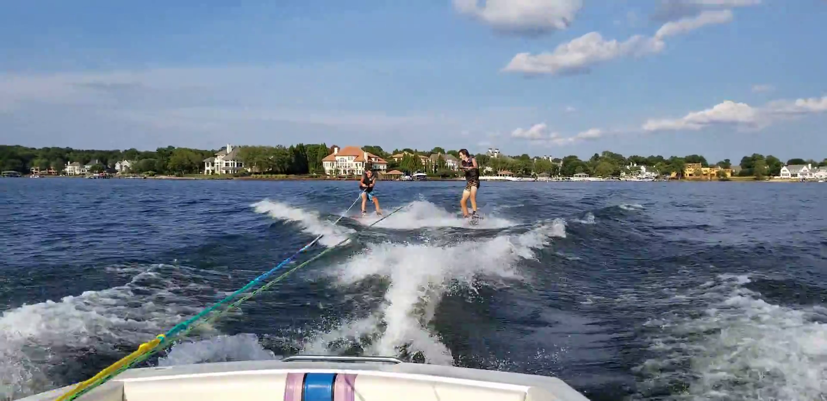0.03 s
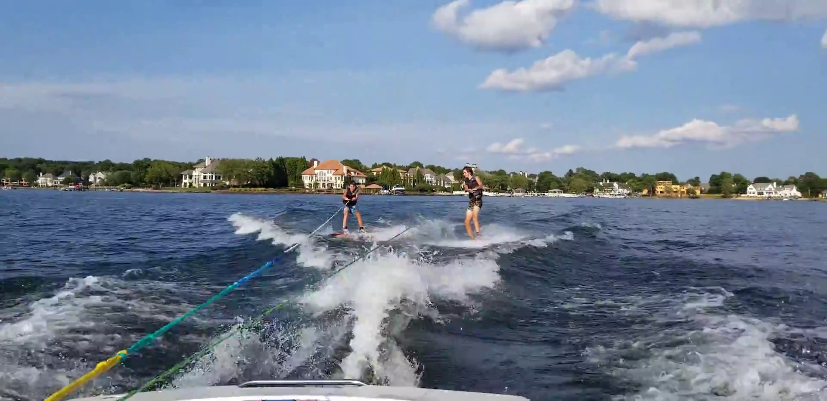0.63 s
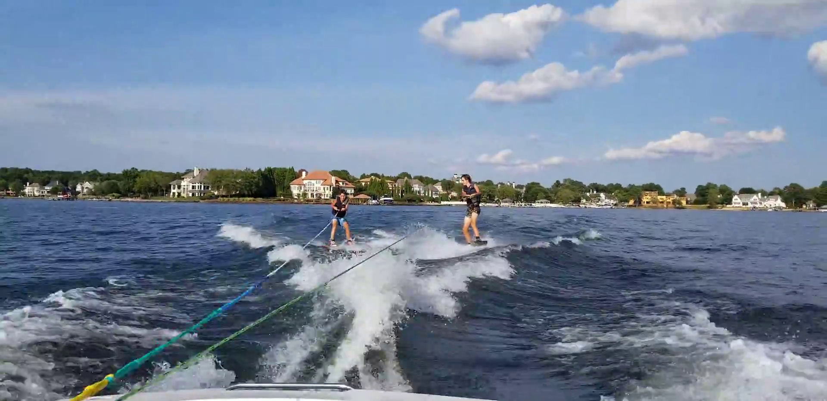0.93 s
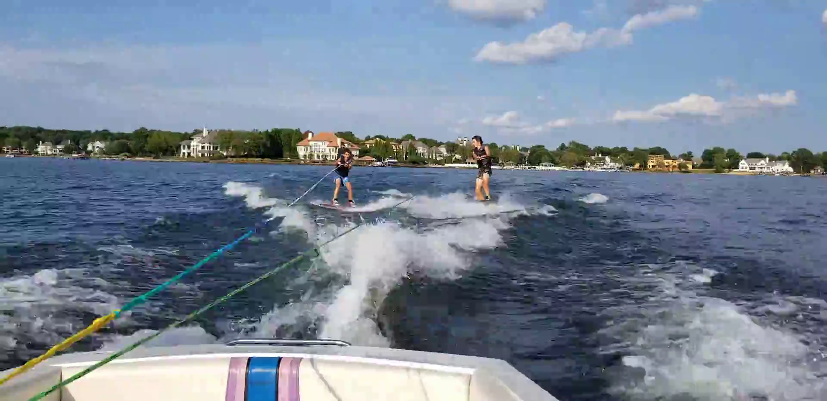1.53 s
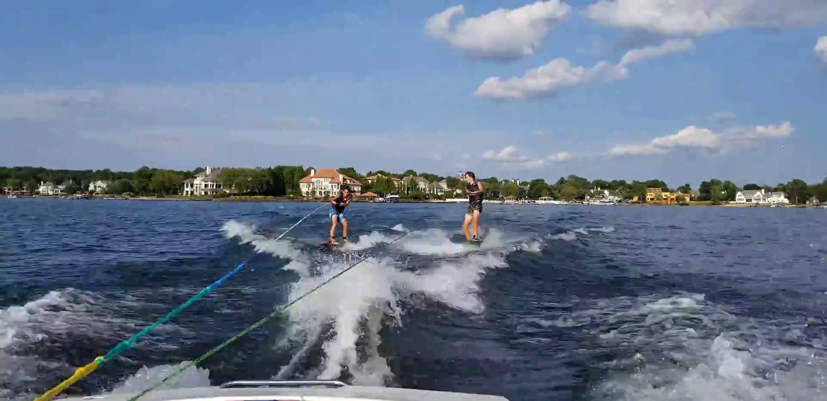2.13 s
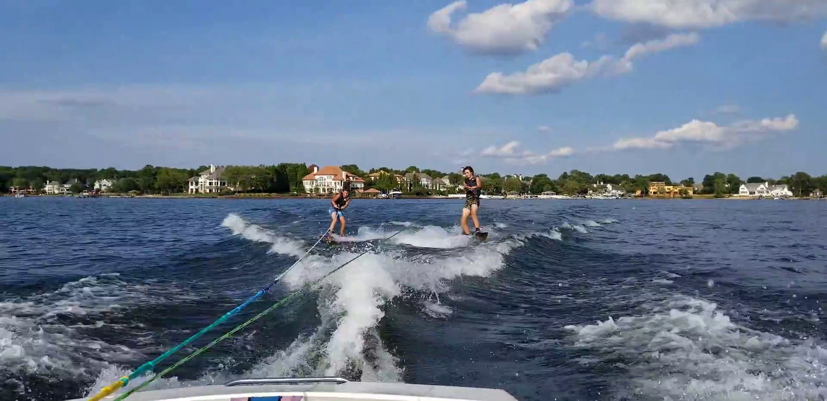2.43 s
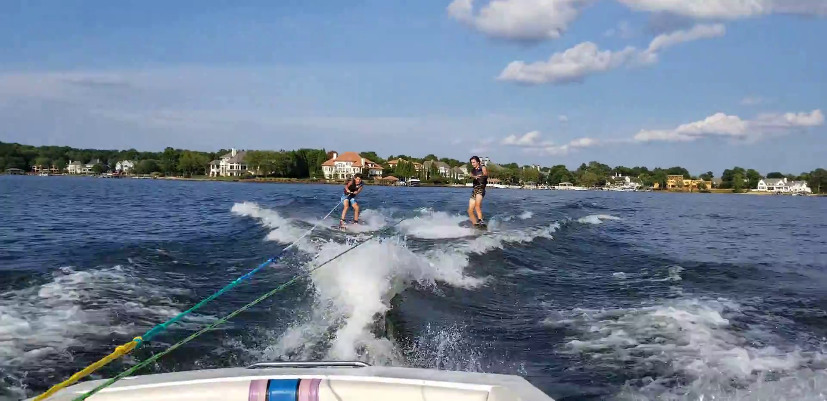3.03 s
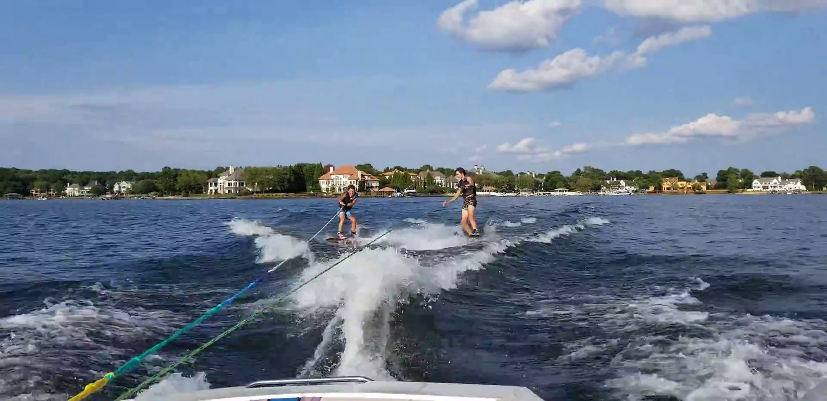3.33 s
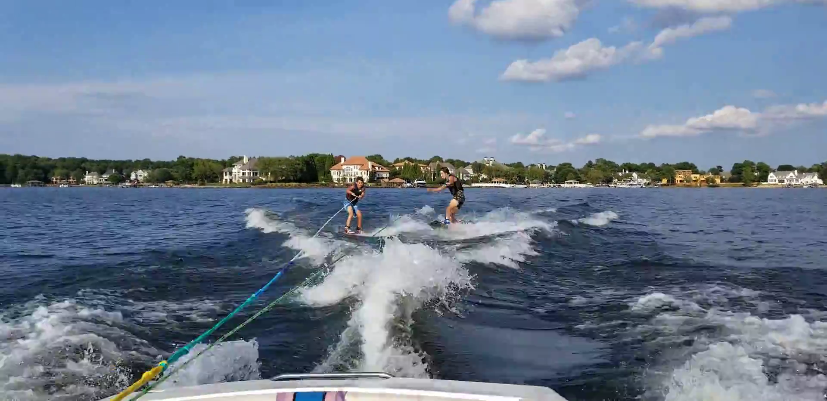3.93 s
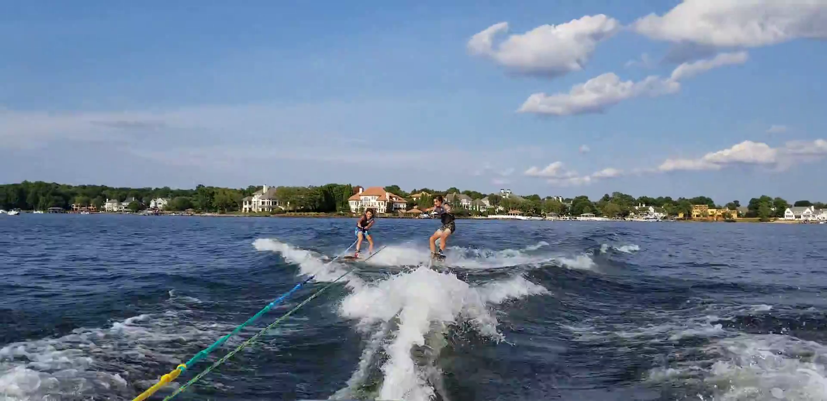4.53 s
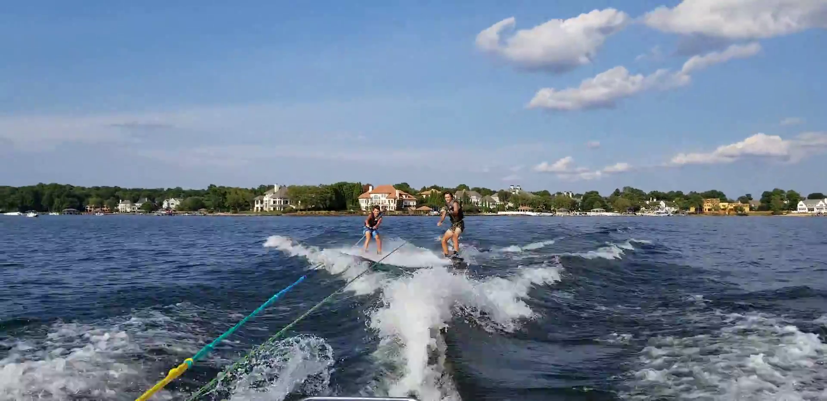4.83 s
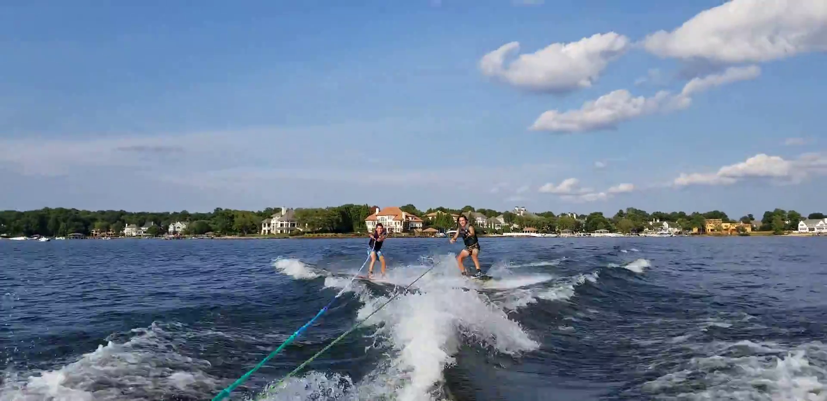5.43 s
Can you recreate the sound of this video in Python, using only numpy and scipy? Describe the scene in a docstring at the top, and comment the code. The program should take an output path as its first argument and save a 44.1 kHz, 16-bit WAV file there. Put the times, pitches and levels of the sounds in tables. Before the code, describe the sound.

Steady motorboat drone with a pulsing hull boom and gurgling exhaust, mixed with rushing wake water and rumbling wind.

```python
"""A ski boat's V8 at a steady 2000 rpm, towing two skiers across a lake; stereo microphone on board,
facing the stern. Close by, the engine drones and blats through its wet exhaust and gurgles when water
washes over the outlet. The three-bladed propeller makes the hull boom in swells, and the drive whines
faintly. Astern, the wake churns, rushes and sprays over a low rumble of wind and water."""
import sys
import numpy as np
from scipy import signal
from scipy.fft import irfft, next_fast_len
from scipy.io import wavfile

SR = 44100
rng = np.random.default_rng(int(sys.argv[2]) if len(sys.argv) > 2 else 0)


def to_wav(sig):
    """Store sig (one row per channel, or 1-D mono) as 16-bit WAV at the path in sys.argv[1].

    Samples outside -1..1 are clipped; the rate is SR.
    """
    pcm = np.clip(np.atleast_2d(sig), -1, 1) * 32767
    pcm = np.round(pcm).astype(np.int16)
    wavfile.write(sys.argv[1], SR, pcm.T)  # frames by channels


N = 246519
TIME = np.arange(N) / SR
FREQS = np.fft.rfftfreq(next_fast_len(N), 1 / SR)

# engine speed: t/s, four-stroke cycle rate/Hz
CYCLE_RATE = [(0, 16.66), (0.6, 16.66), (1.4, 16.69), (2.2, 16.71), (3, 16.74), (3.7, 16.8), (4.2, 16.8),
              (4.7, 16.72), (5.59, 16.73)]
# lines of the exhaust drone: multiple of the cycle rate, relative level/dB
DRONE_LINES = [(2, -15), (3, -11.5), (4, -5.5), (5, -3), (7, -14.5), (8, 0.5), (9, -19), (10, -4.5),
               (11, -10), (12, -14), (13, -10), (14, -16), (15, -25.5), (16, -14.5), (17, -20.5), (18, -16),
               (19, -18.5), (20, -18.5), (21, -25), (22, -24), (23, -28), (24, -21), (25, -24)]
# loudness of the whole drone: t/s, level/dB
DRONE_LEVEL = [(0, -24.5), (.4, -23), (2.5, -23.5), (2.75, -25.5), (3.0, -22), (3.5, -22), (3.8, -21),
               (3.99, -25), (4.2, -22), (4.5, -22), (5.3, -24.5), (5.59, -21)]
# lift of the drone's upper lines: t/s, gain/dB
DRONE_TOP_LIFT = [(0, -1), (1, -1.2), (2.5, 0.5), (3.6, -1), (4.5, 0.9), (5.59, 2)]
# the eight firings of a cycle, relative strengths: blat/dB, burble/dB
FIRING_PATTERN = [(-1, 0.5), (0.5, -13), (-1, -11), (-2.5, -20), (2, -20), (-2, -13), (4, -31), (-10, 1)]
# exhaust resonances of the blat and of the burble: f/Hz, width/Hz, gain/dB
BLAT_RESONANCES = [(310, 46.3, 2), (369, 69, -2.5), (473, 45, -2.5)]
BURBLE_RESONANCES = [(621, 32, -1.5), (681, 44, -3)]
# water washes over the outlet and makes it gurgle: peak t/s, half length/s, level/dB
OUTLET_GULPS = [(.48, 0.098, -46), (1.07, .11, -42), (2.14, 0.073, -38.5), (2.55, 0.12, -43),
                (2.77, .05, -45), (3.45, 0.092, -38), (4.8, 0.063, -43)]
# the hull boom swells as the stern rides the waves: peak t/s, half length/s, level/dB
BOOM_SWELLS = [(.12, 0.084, -17.5), (.44, 0.27, -14.5), (.87, 0.12, -16), (1.41, 0.083, -14.5),
               (1.69, 0.087, -20), (1.92, 0.08, -13.5), (2.1, 0.048, -18), (2.3, .06, -23.5),
               (2.48, 0.043, -27), (2.71, .07, -16), (2.99, .045, -22.5), (3.19, .072, -12.5),
               (3.63, 0.065, -19), (3.955, 0.066, -13.5), (4.31, 0.13, -15), (4.63, .06, -13.5),
               (4.92, .085, -13.5), (5.28, 0.067, -12), (5.53, 0.24, -19)]
# main whistle of the drive: t/s, f/Hz, level/dB
WHINE_CURVE = [(0, 4077, -51.5), (.3, 4074, -59.5), (1.2, 4066, -59.5), (1.85, 4084, -49), (2.2, 4075, -56),
               (3.8, 4098, -57), (4.1, 4101, -46.5), (4.8, 4073, -45), (5.59, 4098, -47)]
# all its whistles: ratio to the main pitch, flutter width/Hz, gain/dB, left minus right/dB
WHINE_WHISTLES = [(1, 38, 0, 10), (1.169, 60, -7.5, 12), (1.5, 60, -9.5, 1)]
# crests break astern, nearly three a second, relative to the steady wash: peak t/s, rush/dB, spray/dB
WAKE_CRESTS = [(0, -1, -3), (.345, 1.5, 2), (.75, 2.5, 4.5), (1.0, -3, 1.5), (1.49, 2.5, 3),
               (2.01, 1.5, -1), (2.26, 1.8, 3), (2.69, .5, -.8), (3.07, 3.5, 4), (3.46, 2.5, 2),
               (3.87, 2, 3), (4.22, 2, 2), (4.58, 2.2, 4.5), (4.87, 2, 1.5), (5.2, 1, 0.5),
               (5.56, 1.5, 3.5)]
# spectra of the water and air noises: f/Hz, relative density/dB
CHURN_SPECTRUM = [(200, 1), (350, -7), (500, 6), (750, 1.5), (1000, 0), (1400, -3.5), (2200, -7),
                  (4000, -42)]
RUSH_SPECTRUM = [(700, -16), (1300, -4), (2000, -0.5), (2600, -1.5), (3600, -2), (4700, -5.5), (5500, -11),
                 (7000, -10), (12000, -43)]
SPRAY_SPECTRUM = [(3000, -6), (5500, 3.5), (7000, 1), (8200, 3.5), (9700, 0.5), (10800, 1.5), (11900, 3.5),
                  (13200, 0), (14500, 2.5), (15600, -1)]
RUMBLE_SPECTRUM = [(12, -22), (22, -16), (32, 2), (45, -8), (90, 7), (150, 3.5), (210, -6.5), (260, -5.5),
                   (400, -13), (600, -18), (1000, -31.5)]
# balance of those noises at the microphone: f/Hz, left minus right/dB
WATER_BALANCE = [(100, 7.5), (500, 3), (1200, 3.5), (2000, 2.5), (2700, 3.5), (3600, 8), (4600, 10.5),
                 (5500, 6.5), (6500, 2), (9300, -1), (11800, 5), (14000, 1), (15800, 1.5)]
# water noise that comes straight from one side of the wake: f/Hz, share of the power (0-1)
DIRECT_SHARE = [(100, 0), (700, 0.17), (1500, 0.4), (2600, 0.41), (4500, 0.33), (7000, 0), (15000, 0.3)]


def from_db(db):
    """Decibels to gain."""
    return 10 ** (np.asarray(db) / 20)


def rms_one(x):
    """Scale to rms 1."""
    return x / np.sqrt(np.mean(x ** 2) + 1e-20)


def in_time(rows):
    """Each value column of a curve over time, at every sample."""
    times, *columns = np.transpose(rows)
    return [np.interp(TIME, times, column) for column in columns]


def over_hz(points):
    """A curve over frequency, joined on a log axis."""
    hz, value = np.transpose(points)
    return np.interp(np.log(FREQS + 1), np.log(hz), value)


def white_spectrum():
    """The spectrum of a fresh white noise."""
    return rng.standard_normal(len(FREQS)) + 1j * rng.standard_normal(len(FREQS))


def drift(rate_hz):
    """A random wander of rms 1, moving at up to about rate_hz."""
    knots = rng.standard_normal(4096)
    return rms_one(np.interp(TIME * rate_hz * 2, np.arange(len(knots)), knots))


def pan(left_db):
    """Left and right gains, the left louder by left_db."""
    return from_db(np.array([[.5], [-.5]]) * left_db)


def swell_level(swells, rest_db, roundness):
    """Level in dB of rounded swells over a resting level; their powers add."""
    power = sum(from_db(db) ** 2 * np.exp(-np.abs((TIME - peak_s) / half_s) ** roundness)
                for peak_s, half_s, db in swells)
    return 10 * np.log10(power + from_db(rest_db) ** 2)


def resonate(x, modes):
    """Parallel resonances with alternating signs; rms 1."""
    out = 0
    for k, (hz, width_hz, db) in enumerate(modes):
        r, w = np.exp(-np.pi * width_hz / SR), 2 * np.pi * hz / SR
        ring = signal.lfilter([1 - r * r, 0, r * r - 1], [1, -2 * r * np.cos(w), r * r], x)
        out = out + (-1) ** k * from_db(db) * ring
    return rms_one(out)


def exhaust_drone(cycles, dispersion=0.072, smear_rad=0.018, waver=0.16, first_top_order=13):
    """Unequal cylinders sound multiples of the cycle rate; the pipe delays the high ones: beats merge."""
    level_db, = in_time(DRONE_LEVEL)
    top_db, = in_time(DRONE_TOP_LIFT)
    lines = 0
    for order, db in DRONE_LINES:
        phase = 2 * np.pi * order * (cycles - dispersion * order) + smear_rad * order * drift(4)
        gain = from_db(db + (top_db if order >= first_top_order else 0))
        lines = lines + gain * (1 + waver * drift(6)) * np.cos(phase)
    return from_db(level_db) * rms_one(lines)


def exhaust_puffs(cycles, pattern_db, modes, decay, rough, uneven_db, jitter):
    """Each firing is a pressure pulse and a dying gas puff, pushed unevenly through water into modes."""
    # age, decay and jitter count in firing intervals
    firing, age = np.divmod(cycles * len(pattern_db) + jitter * drift(25), 1)
    firing = firing.astype(int)
    strength = from_db(pattern_db[firing % len(pattern_db)] + uneven_db * rng.standard_normal(1024)[firing])
    pulses = rms_one(strength * np.diff(firing, prepend=firing[0]))
    gas = rms_one(strength * np.exp(-age / decay) * rng.standard_normal(N))
    return resonate(pulses + rough * gas, modes)


def wet_exhaust(cycles, burble_db):
    """At the stern, louder in the left channel: a low drone, rough blats, one hollow burble a cycle."""
    blat_pattern, burble_pattern = np.transpose(FIRING_PATTERN)
    drone = exhaust_drone(cycles)
    blat = from_db(-39) * exhaust_puffs(cycles, blat_pattern, BLAT_RESONANCES,
                                        decay=0.33, rough=1.0, uneven_db=1.1, jitter=0.05)
    burble = from_db(burble_db) * exhaust_puffs(cycles, burble_pattern, BURBLE_RESONANCES,
                                                decay=1.0, rough=0.97, uneven_db=0.8, jitter=0.025)
    return pan(3.3) * drone + pan(9.0) * blat + pan(6.3) * burble


def propeller(cycles, blades=3, turns_per_cycle=2, wander_rad=0.25):
    """The blades beat on the hull under the stern; the inflow swells and shifts the beat."""
    boom_db = swell_level(BOOM_SWELLS, rest_db=-24.5, roundness=2.06)
    phase = 2 * np.pi * blades * turns_per_cycle * cycles + wander_rad * drift(2.7)
    return from_db(boom_db) * np.sqrt(2) * np.cos(phase)


def drive_whine(flutter_db=1.2):
    """Thin whistles of the drive rise and fall together, each fluttering a little in pitch and level."""
    pitch_hz, level_db = in_time(WHINE_CURVE)
    whistles = 0
    for ratio, width_hz, db, left_db in WHINE_WHISTLES:
        hz = ratio * pitch_hz + width_hz / 2 * drift(40)
        tone = np.sin(2 * np.pi * np.cumsum(hz) / SR)
        whistles = whistles + from_db(db + flutter_db * drift(15)) * pan(left_db) * tone
    return from_db(level_db) * whistles


def breaking_crests(rise_s=0.11, fall_s=0.13, roundness=1.33):
    """Rush and spray in dB over the steady wash: each crest builds to a point and ebbs more slowly."""
    power = 1
    for peak_s, *lift_db in WAKE_CRESTS:
        from_peak = np.maximum((peak_s - TIME) / rise_s, (TIME - peak_s) / fall_s)
        power = power + np.outer(from_db(lift_db) ** 2, np.exp(-from_peak ** roundness))
    return 10 * np.log10(power)


def water_noise(spectrum, flicker_db, flicker_hz, port_spacing_s=0.00036, right_lead_s=0.0004015):
    """Noise from all around, alike at both microphone ports in the bass; a part hits the right first."""
    coherence = np.sinc(2 * FREQS * port_spacing_s)
    mid = np.sqrt(1 + coherence) * white_spectrum()
    side = np.sqrt(1 - coherence) * white_spectrum()
    around = np.array([mid + side, mid - side]) / np.sqrt(2)
    delay_s = np.array([[right_lead_s], [0]])
    direct = white_spectrum() * np.exp(-2j * np.pi * FREQS * delay_s)
    share = np.clip(over_hz(DIRECT_SHARE), 0, 1)
    field = np.sqrt(1 - share) * around + np.sqrt(share) * direct
    coloured = field * from_db(over_hz(spectrum)) * pan(over_hz(WATER_BALANCE))
    noise = rms_one(irfft(coloured, next_fast_len(N))[:, :N])
    return noise * from_db(flicker_db * drift(flicker_hz))


def bubbles(per_pitch_per_s=70, ring_cycles=27, spread_db=2.0):
    """Small bubbles pinch off at random in the foam, each dying by 60 dB over ring_cycles."""
    out = np.zeros((2, N))
    for hz in np.geomspace(900, 5000, num=10):
        born = rng.random((2, N)) < per_pitch_per_s / SR
        strengths = from_db(spread_db * np.minimum(rng.exponential(1, 8192), 4))
        signs = rng.choice([-1, 1], 8192)
        clicks = np.zeros((2, N))
        clicks[born] = np.resize(strengths * signs, born.sum())
        r, w = from_db(-60 * hz / (ring_cycles * SR)), 2 * np.pi * hz / SR
        out += signal.lfilter([0, np.sin(w)], [1, -2 * r * np.cos(w), r * r], clicks + 1e-18)
    return rms_one(out)


def wake(gulp_db):
    """Heavy water churns at the stern; behind it crests rush and bubble, and fine spray hisses."""
    rush_db, spray_db = breaking_crests()
    churn_db = -0.14 * rush_db + 0.075 * gulp_db   # sinks as a crest breaks, rises with a gulp
    churn = from_db(-34 + churn_db) * water_noise(CHURN_SPECTRUM, flicker_db=0.8, flicker_hz=20)
    rush = from_db(-38 + rush_db) * water_noise(RUSH_SPECTRUM, flicker_db=0.72, flicker_hz=30)
    spray = from_db(-41.5 + spray_db) * water_noise(SPRAY_SPECTRUM, flicker_db=0.65, flicker_hz=77)
    foam = from_db(-51 + rush_db) * pan(3.0) * bubbles()
    return churn + rush + spray + foam


def rumble():
    """Wind and water rumble low all around the boat."""
    return from_db(-30) * water_noise(RUMBLE_SPECTRUM, flicker_db=1.0, flicker_hz=6)


def scene():
    """From on board: exhaust, propeller and drive close by, the wake astern, rumble all around."""
    cycle_hz, = in_time(CYCLE_RATE)
    cycles = 0.4 + np.cumsum(cycle_hz) / SR
    burble_rest_db = -46.5
    burble_db = swell_level(OUTLET_GULPS, burble_rest_db, roundness=1.8)
    boat = wet_exhaust(cycles, burble_db) + pan(3.9) * propeller(cycles) + drive_whine()
    return boat + wake(gulp_db=burble_db - burble_rest_db) + rumble()


def record(dry, cutoff_hz=15780):
    """A steep low-pass cuts the top of the spray."""
    return signal.sosfilt(signal.ellip(12, .1, 80, cutoff_hz, fs=SR, output="sos"), dry)


dry = scene()
out = record(dry)
to_wav(out)
```